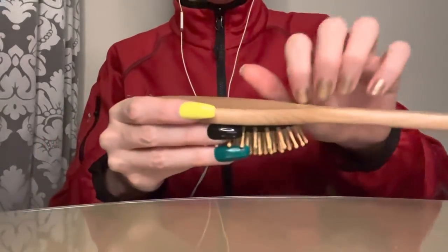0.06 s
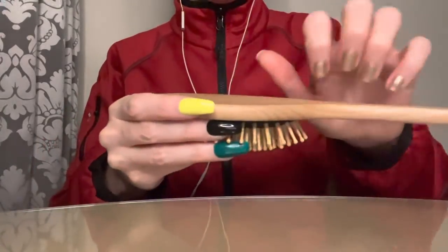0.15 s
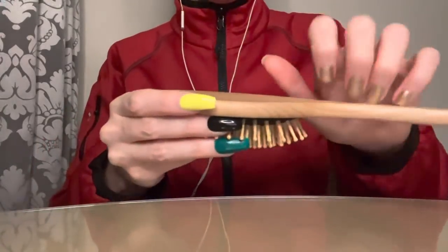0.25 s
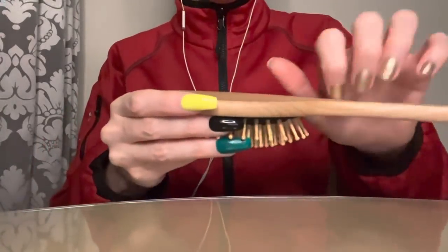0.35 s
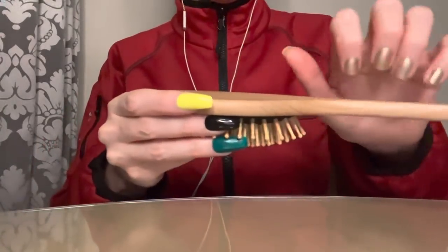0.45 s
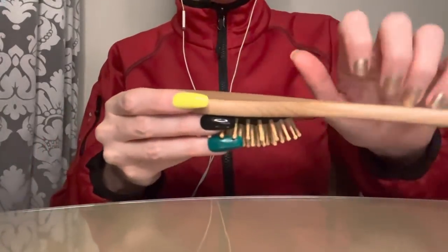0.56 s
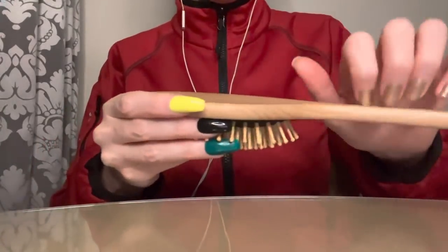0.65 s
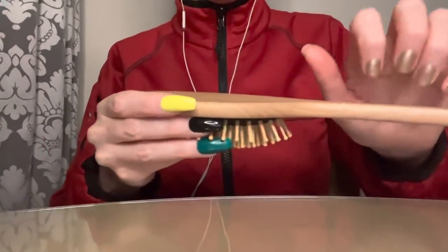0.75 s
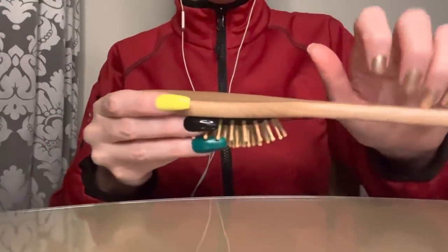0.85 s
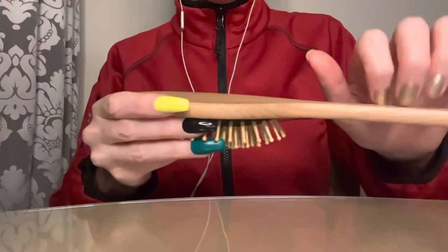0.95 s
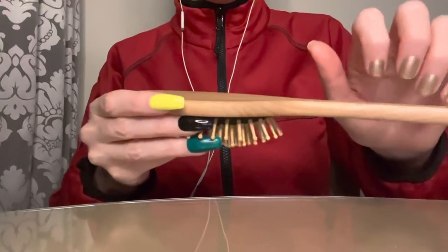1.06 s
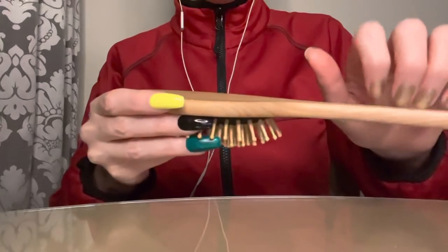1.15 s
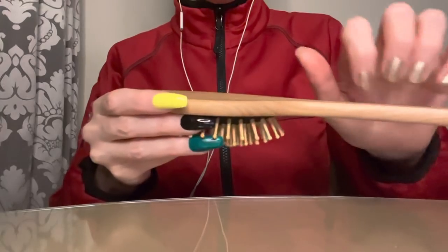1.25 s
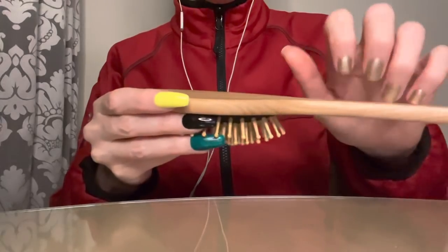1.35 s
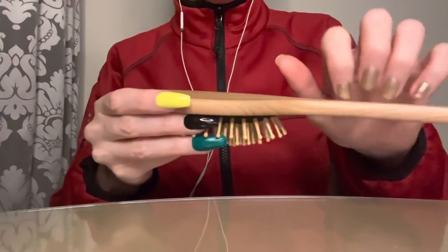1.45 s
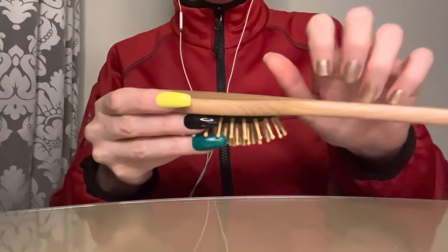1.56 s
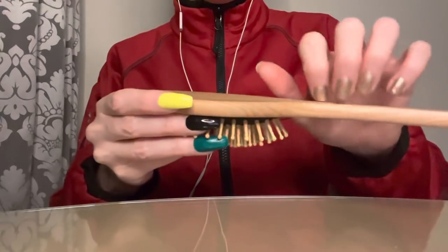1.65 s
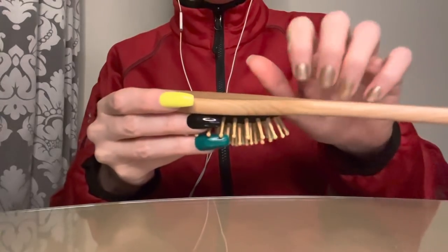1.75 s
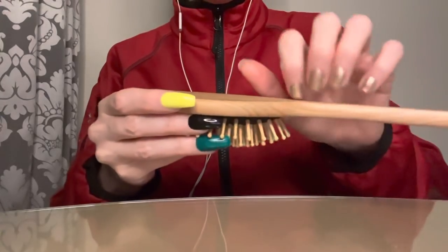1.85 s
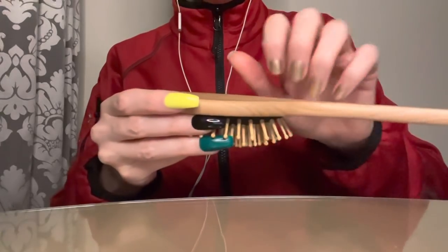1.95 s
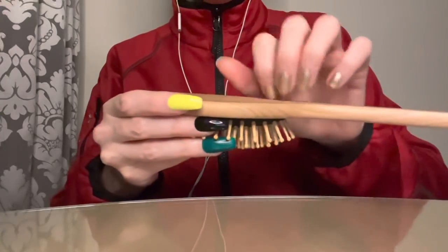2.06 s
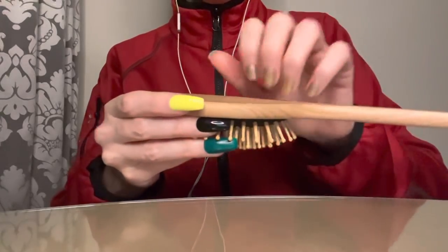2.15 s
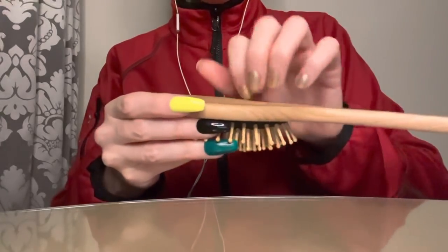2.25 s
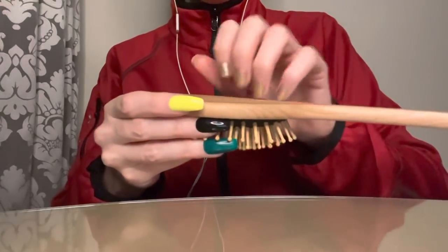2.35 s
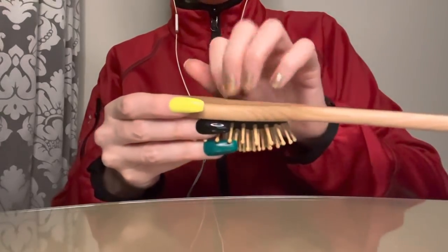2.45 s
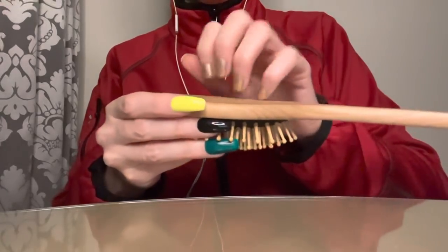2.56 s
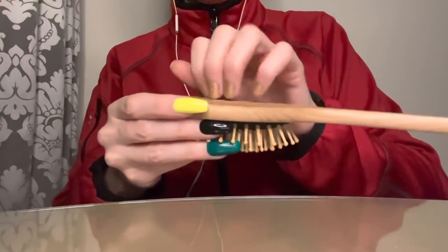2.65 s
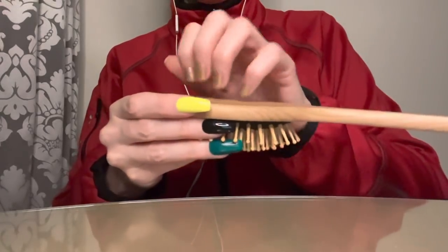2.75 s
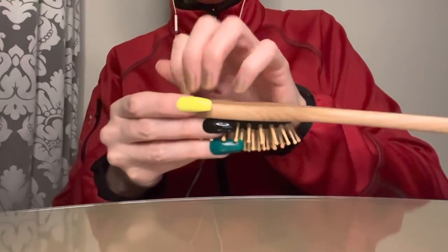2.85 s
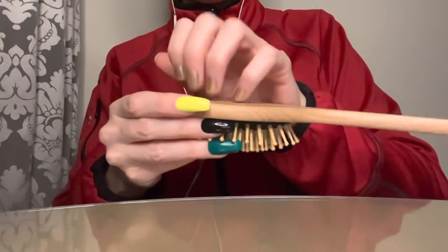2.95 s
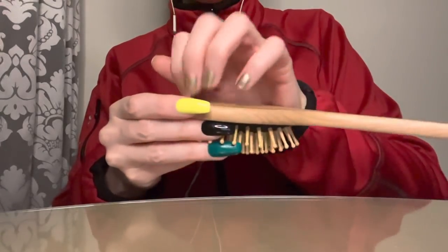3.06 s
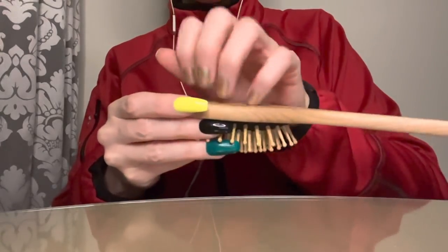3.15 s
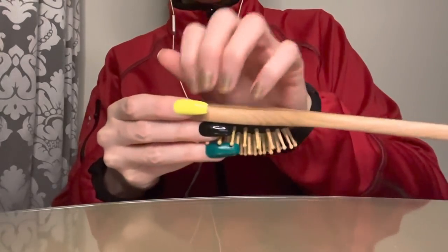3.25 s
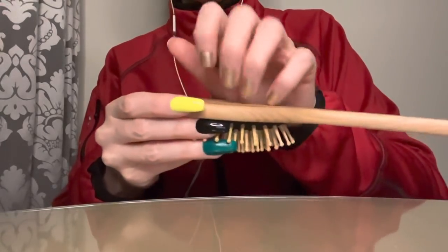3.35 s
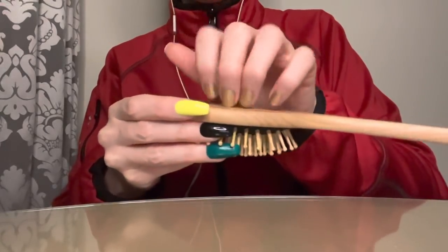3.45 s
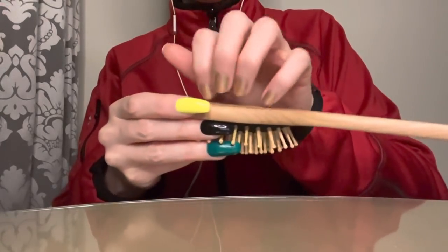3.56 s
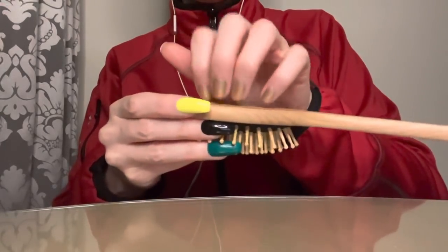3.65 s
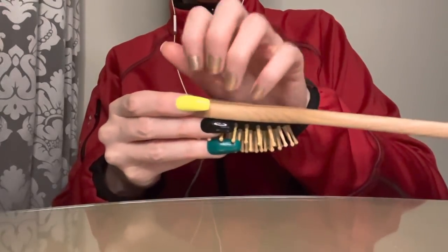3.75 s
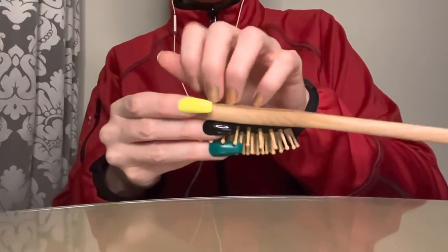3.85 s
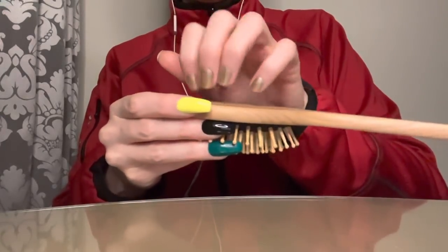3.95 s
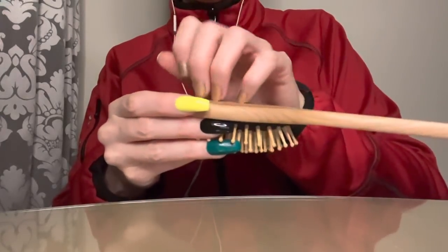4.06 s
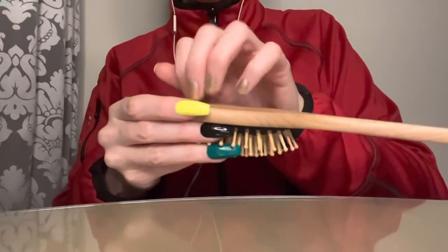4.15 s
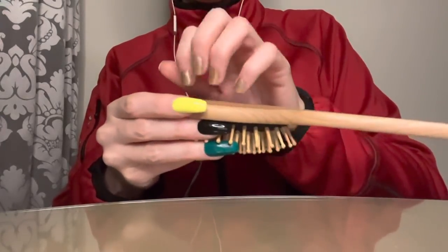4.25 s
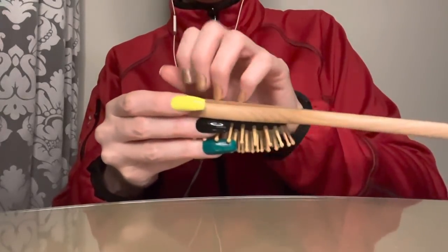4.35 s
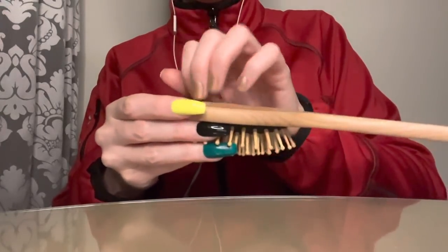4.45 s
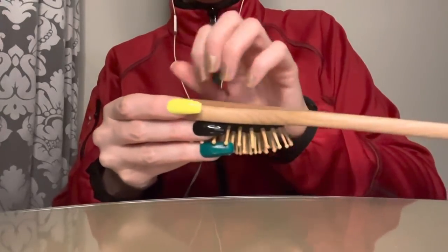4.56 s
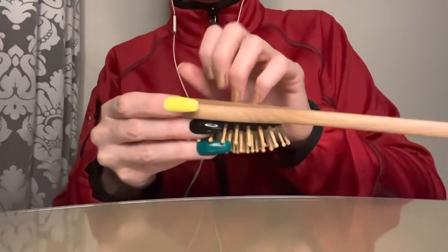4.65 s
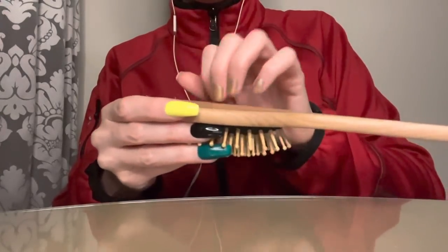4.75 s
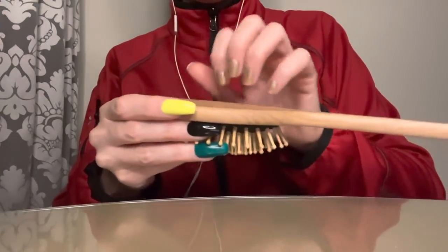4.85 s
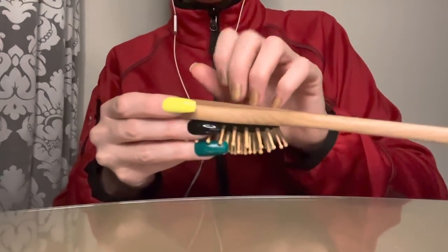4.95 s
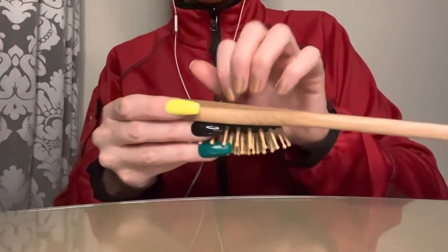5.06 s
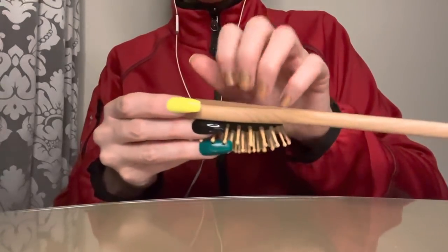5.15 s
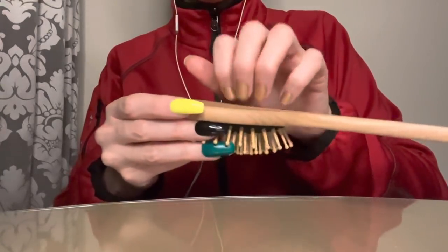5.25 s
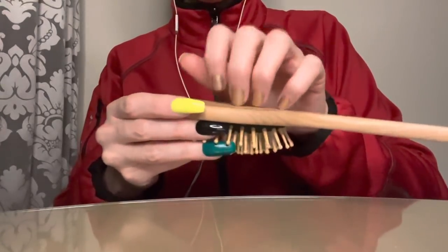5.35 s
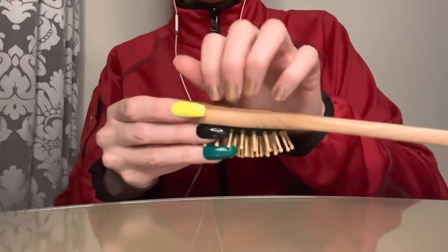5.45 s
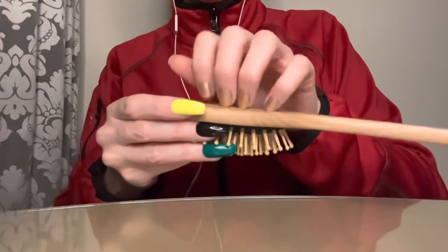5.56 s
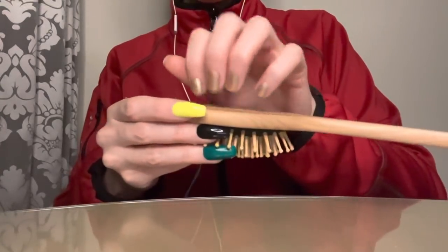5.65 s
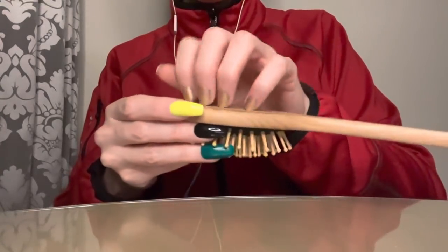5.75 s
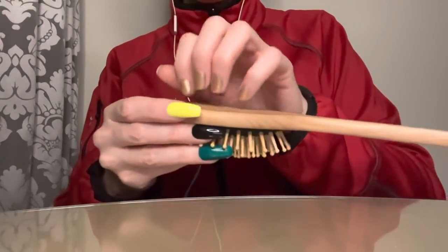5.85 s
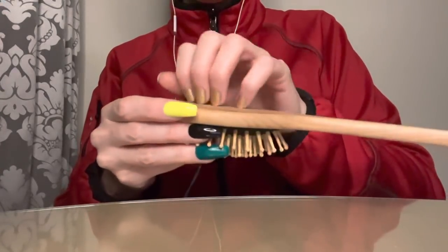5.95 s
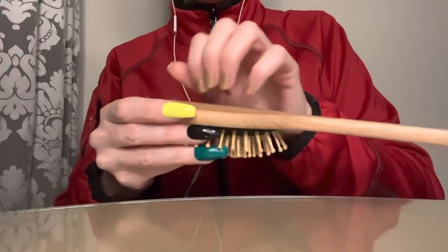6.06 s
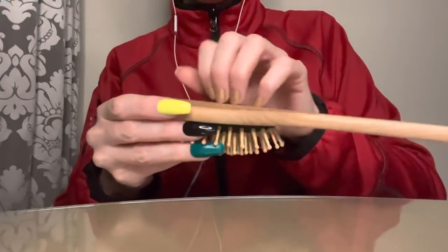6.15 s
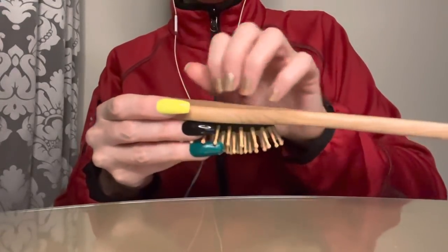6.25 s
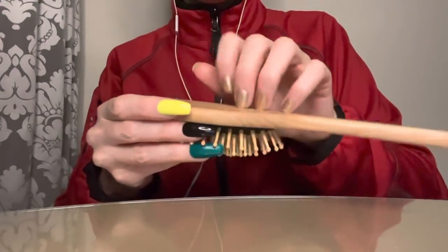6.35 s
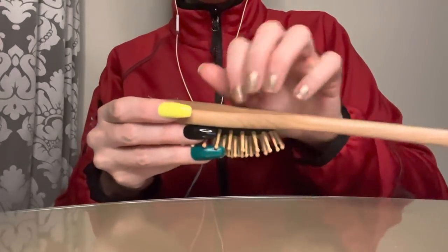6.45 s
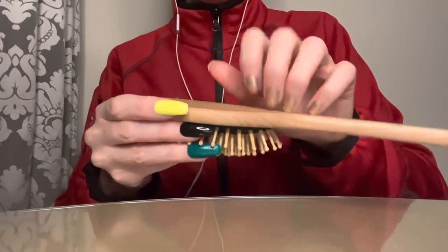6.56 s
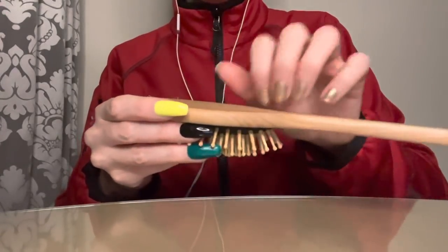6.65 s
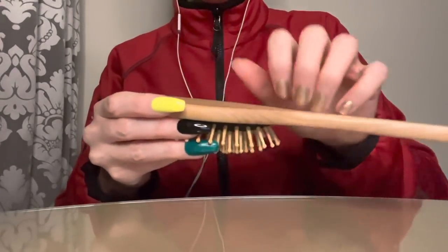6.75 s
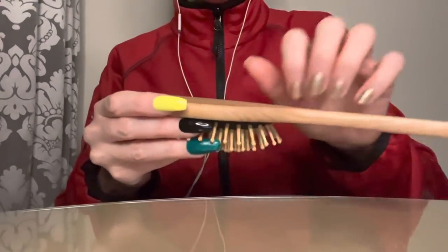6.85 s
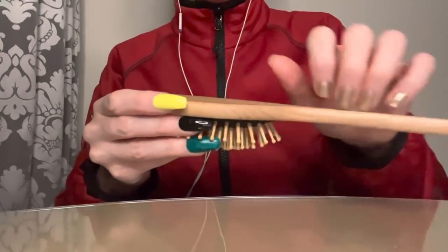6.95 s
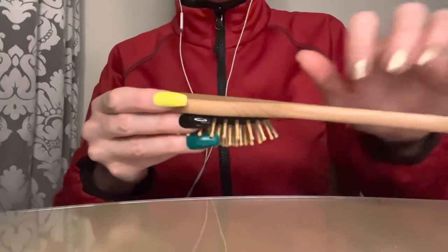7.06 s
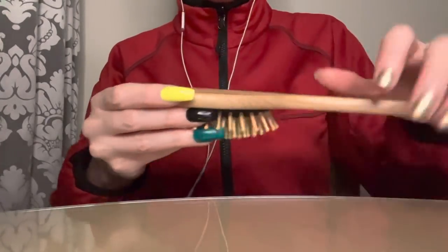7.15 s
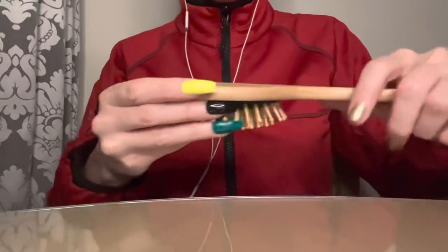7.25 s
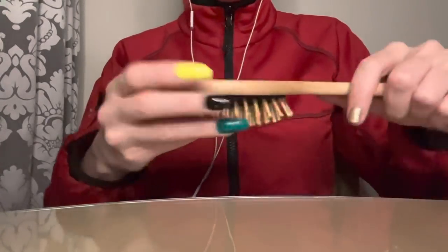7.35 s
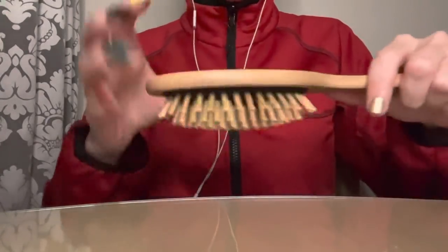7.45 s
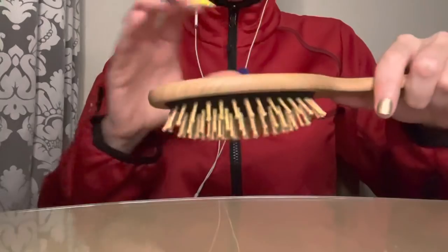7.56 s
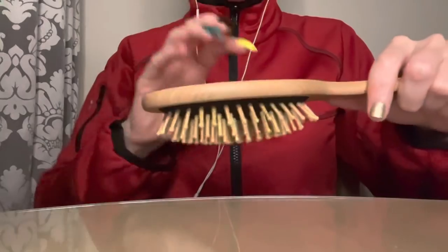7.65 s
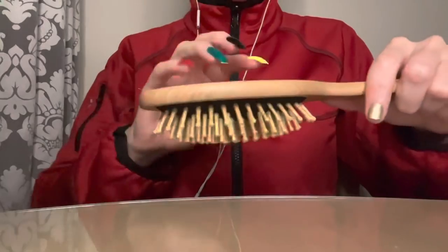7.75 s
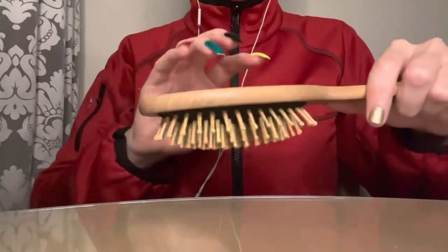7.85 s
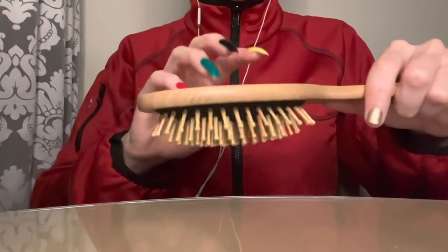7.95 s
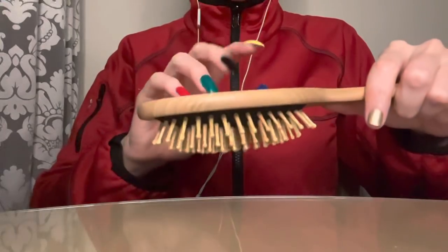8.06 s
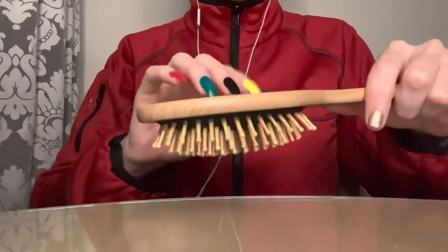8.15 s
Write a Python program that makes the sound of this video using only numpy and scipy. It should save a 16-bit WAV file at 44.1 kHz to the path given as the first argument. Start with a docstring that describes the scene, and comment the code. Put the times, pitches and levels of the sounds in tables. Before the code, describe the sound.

Long fingernails drum quick rolling flurries of dry, light clicks on a hand-held wooden hairbrush, then a hand slides and grips, followed by four crisp rim taps.

```python
"""Fingernails on a wooden hairbrush

Close microphone, small quiet room: long nails drum in quick rolls on a hand-held wooden hairbrush.
They wander from the handle over the back of the head to its tip and return; the hand slides along
the handle and grips it, then the nails of the other hand tap the rim of the head four times.
Each tap is a push that sets off decaying wood modes, plus a noisy treble tick; skids and grip are
clumped noise through the same wood. Shaped noise makes the room tail, the still air and a low hum."""
import sys
import numpy as np
from scipy import signal
from scipy.fft import rfft, irfft
from scipy.io import wavfile
from scipy.ndimage import uniform_filter1d

SR = 44100
rng = np.random.default_rng(int(sys.argv[2]) if len(sys.argv) > 2 else 0)


def wav_record(signal):
    """Record a signal, one row per channel, as 16-bit PCM in the file named by sys.argv[1]."""
    frames = np.transpose(np.atleast_2d(signal))
    bounded = np.clip(frames, -1, 1)
    # unit amplitude maps onto the largest positive 16-bit level
    quanta = np.round(bounded * 32767).astype(np.int16)
    wavfile.write(sys.argv[1], SR, quanta)


N = 362061  # length in samples

# Nail taps: start_s, strength_db, hardness_db (below 0 the nail lands flat, above 0 on its edge)
NAIL_TAPS = [(0.0267, -38, -4.5), (0.2264, -42, 8.5), (0.2523, -32.5, 0), (0.291, -32.5, -2),
             (0.3392, -38.5, -2.5), (0.5483, -37.5, 7), (0.602, -35, 0.5), (0.648, -42.5, 2),
             (0.8398, -44.0, 0.5), (0.869, -41.5, -5.5), (0.9126, -40, 5.5), (0.9667, -44.5, 10),
             (1.1155, -43.5, 0.5), (1.181, -41.5, 8.5), (1.199, -41, 7.5), (1.3545, -42.5, 1),
             (1.3757, -41.5, 10), (1.569, -40.5, 10), (1.641, -37.5, -7), (1.7759, -40, 6),
             (1.7866, -34, -5), (1.8347, -35.5, -4), (1.9885, -30.0, -4), (2.0269, -34.5, -6.5),
             (2.0478, -33, -3), (2.1953, -33.5, -7.5), (2.2146, -31, 0), (2.2281, -24.5, 1.5),
             (2.38, -25, 1), (2.4085, -25, 0.5), (2.4399, -25.5, 0), (2.5809, -32, 1.5), (2.598, -22, 0),
             (2.632, -25, -0.5), (2.6525, -31.0, 0.5), (2.7996, -32.5, 4.5), (2.8143, -27, -2),
             (2.8372, -32.5, -1), (2.9946, -23.5, -0.5), (3.001, -24, -0.5), (3.1793, -35.5, -1),
             (3.194, -28.0, -4), (3.2175, -35, -11.5), (3.3784, -37.0, 2.5), (3.3932, -24.0, 0),
             (3.4171, -29.0, 5), (3.5901, -33, 0), (3.6226, -37, -3), (3.7905, -29.5, 3),
             (3.8103, -25.0, 1.5), (3.859, -27.5, -7.5), (4.0392, -29, 11.5), (4.062, -28, -1),
             (4.0824, -27.5, -3.5), (4.157, -32.0, -2.5), (4.3239, -29.0, 4.5), (4.3573, -31.5, -0.5),
             (4.4001, -26.5, 0.5), (4.4567, -32.5, -1), (4.6364, -28.5, 7.5), (4.6608, -27.0, 2.5),
             (4.7134, -30, 2), (4.7582, -35.5, -8), (4.922, -35.0, 1), (4.9399, -25.5, -2),
             (4.9884, -25, 0), (5.0332, -38.5, -3.5), (5.175, -37.5, 0), (5.192, -27.5, -10.5),
             (5.2083, -28.5, 0), (5.3543, -43.0, -7), (5.3745, -26, -3), (5.551, -36, 3),
             (5.563, -25, -0.5), (5.5669, -30.5, -5), (5.7454, -34, -6), (5.753, -22.0, 5.5),
             (5.767, -25.5, -1.5), (5.933, -32, 3), (5.9475, -26.5, 0.5), (5.9649, -30, -5.5),
             (5.9696, -31.5, -1), (6.1465, -33.5, 4), (6.1557, -27.5, -4), (6.168, -29.0, -3),
             (6.3298, -29.5, 0), (6.355, -30.0, -1.5), (6.567, -35.5, -8), (6.5899, -32, -4.5),
             (6.6247, -34.5, 0.5), (6.778, -36, -6), (6.9828, -38, -0.5), (7.9542, -30.5, 8),
             (8.0248, -28.5, -6.5), (8.1325, -25.0, -0.5), (8.1772, -27.0, 1)]
# Where the nails land from each time on: start_s, place
TAP_PLACES = [(0, "handle"), (2.1, "back"), (2.75, "tip"), (4.12, "back"), (5.15, "tip"), (6.05, "back"),
              (6.5, "handle"), (7.5, "rim")]
# Modes, all with columns: pitch_hz, t60_s (at damping 1), then relative level_db
# when struck on the handle, the back of the head, its tip, its rim.
# The held brush giving way as a whole
KNOCK_MODES = [(87.6, 0.035, -15, -13.5, -9.5, -18), (345.6, 0.015, -3.5, -8, -2, -8),
               (513, 0.022, -3.5, -10, -6, -7), (641, 0.013, 3.5, 7, 4.5, -9),
               (810, 0.0087, 8.5, -2, -5.5, 17)]
# The wood bending
BENDING_MODES = [(1702, 0.005, -2, -7, 3, 1.5), (2053, 0.019, -9.5, 9.5, 14, 13.5)]
# The bright ring of the wood
RING_MODES = [(3600, 0.0062, 10, -5, -13, 6), (4070, 0.0027, 0, -1, 11, -24),
              (4142, 0.015, 2.5, -13, 16, -8), (4717, 0.015, -2, -5, 0.5, -1.5),
              (6220, 0.0022, 8.5, 5.5, 3, 0.5)]
# Early reflections from table and body: delay_s, level_db
NEAR_ECHOES = [(.0045, -21.5), (0.0115, -20.5)]
# Diffuse room tail: pitch_hz, t60_s, level_db (before the narrow peaks and dips)
ROOM_TAIL = [(577, 0.26, -8), (3000, 0.29, -16.5), (14000, 0.3, -16.5)]
# Colour of the still room air: pitch_hz, relative density_db (per Hz)
AIR_COLOUR = [(30, 1), (70, 3), (1200, -21.5), (15000, -30)]
# Narrow peaks and dips that colour the room tail: center_hz, gain_db (below 0 a dip)
NARROW_COLOURS = [(248, 10.5), (2090, -2.5), (4790, 8)]
# A nail or finger skids briefly over the wood: middle_s, level_db (before its swell and fade)
SKIDS = [(0.018, -44.5), (1.42, -49), (1.587, -35.5), (4.055, -35.5), (4.15, -35.5), (4.346, -33.5),
         (6.542, -45.5), (6.76, -42), (7.306, -48), (7.355, -40), (7.38, -37.5), (7.403, -39.5),
         (7.415, -33.5)]
# Per place, level_db added over 5 ms to: hollow knock, wood bending, bright ring, nail tick
PLACE_VOICING = {"handle": (2, 2.16, 1, 0), "back": (3, -1.6, 2, -3), "tip": (1.5, 1, 0.9, -2.5),
                 "rim": (-8.5, -.5, 7.5, 4.5)}
# Per place, change (dB per dB of hardness) of: knock, bending, ring, tick
PLACE_HARDENING = {"handle": (-0.54, 0.23, 0.5, -0.013), "back": (-0.63, -0.15, 0.47, .7),
                   "tip": (-0.49, 0.38, 0.4, 0.2), "rim": (-0.33, -0.58, -0.15, 0.76)}
# Low hum: time_s, level_db
HUM_LEVEL = [(0.0, -59), (0.27, -53), (1.64, -59.5), (2.05, -49), (3.06, -53.5), (4.84, -49), (5.55, -57),
             (6.46, -45.5), (8.2, -64.5)]

MODE_PLACES = ["handle", "back", "tip", "rim"]  # order of the level columns of the modes
# the hand starts to slide, its fingers start to close, its palm lands, it comes to rest (s)
SLIDE_S, CLOSE_S, LAND_S, REST_S = 7.22, 7.345, 7.401, 7.435
EDGE_HZ = 16300  # upper limit of the sound
T = np.arange(SR // 20) / SR  # time within one blow (s)


def amp(db):
    """Amplitude ratio of a level in dB."""
    return 10 ** (np.asarray(db) / 20)


def evened(x):
    """The sound brought to an RMS of one."""
    return x / np.sqrt(np.mean(x ** 2) + 1e-20)


def read(table_hz, values, hz):
    """A spectrum joined by straight lines over log frequency."""
    return np.interp(np.log(hz + 1), np.log(table_hz), values)


def band(x, hz, kind, order=2):
    """Butterworth filter."""
    sos = signal.butter(order, np.minimum(hz, SR / 2 - 1), kind, fs=SR, output="sos")
    return signal.sosfilt(sos, x)


def add(mix, start_s, sound):
    """Lays a sound into the mix, cut off at its end."""
    part = mix[round(start_s * SR):][:len(sound)]
    part += sound[:len(part)]


def blow(sound, level_db):
    """Gives a blow the energy of 5 ms at this level."""
    return amp(level_db) * sound * np.sqrt(0.005 * SR / np.sum(sound ** 2))


def narrow_colour(hz, quality=24):
    """Gain of the narrow peaks and dips at these frequencies."""
    gain_db = 0
    for center_hz, center_db in NARROW_COLOURS:
        gain_db = gain_db + center_db / (1 + (2 * quality * (hz / center_hz - 1)) ** 2)
    return amp(gain_db)


def background(air_db=-56, hum_hz=49, hum_width_hz=3, waver=0.66):
    """Soft steady air noise with a narrow low peak, and a low hum that swells, fades and wavers."""
    hz = np.fft.rfftfreq(N, 1 / SR)
    colour = amp(read(*np.transpose(AIR_COLOUR), hz))
    colour *= np.where(hz < 400, narrow_colour(hz), 1)
    air = irfft(rfft(rng.standard_normal(N)) * colour, N)

    hum_shape = 1 / (1 + ((hz - hum_hz) / hum_width_hz) ** 2)
    narrow = signal.hilbert(irfft(rfft(rng.standard_normal(N)) * hum_shape, N))
    hum = np.cos(np.angle(narrow)) * abs(narrow) ** waver  # a power below 1 calms the wavering
    hum = band(hum, 2 * hum_hz, "low")
    hum_db = np.interp(np.arange(N) / SR, *np.transpose(HUM_LEVEL))
    return amp(air_db) * evened(air) + amp(hum_db) * evened(hum)


def room(x, walls_s=0.03, scatter_s=0.001):
    """Two scattered near reflections, then a diffuse tail that builds as the walls answer."""
    hz, t, tail_bins = signal.stft(rng.standard_normal(SR // 2), SR, nperseg=256)
    table_hz, t60_s, level_db = np.transpose(ROOM_TAIL)
    fall = np.log(1000) / read(table_hz, t60_s, hz)[:, None]  # decay rate per second
    gain = amp(read(table_hz, level_db, hz))[:, None]
    tail_bins *= gain * np.sqrt(2 * fall / SR) * np.exp(-fall * t)
    tail = signal.istft(tail_bins, SR)[1]
    coloured = irfft(rfft(tail, SR) * narrow_colour(np.fft.rfftfreq(SR, 1 / SR)))
    tail = coloured[:len(tail)]
    tail *= np.minimum(np.arange(len(tail)) / SR / walls_s, 1)
    for delay_s, echo_db in NEAR_ECHOES:
        scatter = rng.standard_normal(len(T)) * np.exp(-T / scatter_s)
        add(tail, delay_s, amp(echo_db) * scatter / np.linalg.norm(scatter))
    return signal.fftconvolve(x, tail)[:N]


def wood(modes, place="handle", damping=1, spread_db=6.0, detune=0.019):
    """Modes start together and die fast; random draws vary their levels widely and pitches slightly."""
    hz, t60_s, *levels_db = np.transpose(modes)[:, :, None]
    level_db = levels_db[MODE_PLACES.index(place)]
    share, shift = rng.standard_normal((2, len(modes), 1))
    decay = amp(level_db + spread_db * share) * np.exp(-np.log(1000) * damping * T / t60_s)
    return np.sum(decay * np.cos(2 * np.pi * hz * (1 + detune * shift) * T), axis=0)


def friction(length_s, grain_db=5, hiss_db=-3, hiss_hz=7500):
    """Tiny slips come in clumps of a millisecond or two, swell and fade; they hiss and excite the wood."""
    count = int(length_s * SR)
    clumps = evened(uniform_filter1d(rng.standard_normal(count), size=70))
    slips = rng.standard_normal(count) * amp(grain_db * clumps)
    response = wood(KNOCK_MODES) / 2 + wood(BENDING_MODES, "back") + wood(RING_MODES, "back")
    body = signal.fftconvolve(slips, response)[:count]
    hiss = band(slips, hiss_hz, "low", order=1)
    rubbing = evened(evened(body) + amp(hiss_db) * evened(hiss))
    return rubbing * np.sin(np.pi * np.arange(count) / count)


def scuffs(length_s=0.025):
    """Short skids between the taps and as the fingers close on the handle."""
    out = np.zeros(N)
    for middle_s, level_db in SKIDS:
        add(out, middle_s - length_s / 2, amp(level_db) * friction(length_s))
    return out


def grip(slide_db=-50, close_db=-44, thud_hz=230, thud_db=-28):
    """The hand slides along the handle, the fingers rub as they close, and the palm lands with a soft thud."""
    out = np.zeros(N)
    add(out, SLIDE_S, amp(slide_db) * friction(REST_S - SLIDE_S, hiss_db=5))
    # soft skin stirs only the low modes
    rub = band(friction(REST_S - CLOSE_S), KNOCK_MODES[-1][0], "low", order=4)
    add(out, CLOSE_S, amp(close_db) * evened(rub))
    cycles = thud_hz * T
    thud = cycles * np.exp(-cycles) * np.sin(2 * np.pi * cycles)
    add(out, LAND_S, blow(thud, thud_db))
    return out


def contact(grain=0.1, settle_s=0.0011):
    """Force of a nail: one sharp push, then a fine chatter while its edge settles."""
    force = grain * rng.standard_normal(len(T)) * np.exp(-T / settle_s)
    force[0] = 1
    return force


def tick(hardness_db, decay_s=0.0013, snap=2.6, low_hz=5400, high_hz=7500, octaves_per_db=0.46):
    """The hard nail edge: a sharp snap and a tiny treble crackle, reaching higher the harder the tap."""
    crack = rng.standard_normal(len(T)) * np.exp(-T / decay_s)
    crack[0] = snap
    treble = band(crack, low_hz, "high", order=3)
    return band(treble, high_hz * 2 ** (octaves_per_db * hardness_db), "low", order=3)


def nails(damping=1, knock_hz=950, bending_hz=1400, ring_hz=2850, top_hz=7000):
    """Every tap knocks the brush, bends it, rings it and ticks; place and hardness set the proportions."""
    out = np.zeros(N)
    for start_s, strength_db, hardness_db in NAIL_TAPS:
        place = [where for from_s, where in TAP_PLACES if from_s <= start_s][-1]
        hardening_db = hardness_db * np.array(PLACE_HARDENING[place])
        levels_db = strength_db + np.array(PLACE_VOICING[place]) + hardening_db
        force = contact()
        # each family of modes radiates in its own range
        knock = signal.fftconvolve(force, wood(KNOCK_MODES, place))
        knock = band(knock, knock_hz, "low", order=4)
        bend = signal.fftconvolve(force, wood(BENDING_MODES, place, damping))
        bend = band(bend, (bending_hz, ring_hz), "band")
        ring = signal.fftconvolve(force, wood(RING_MODES, place, damping))
        ring = band(ring, (ring_hz, top_hz), "band")
        for sound, level_db in zip((knock, bend, ring, tick(hardness_db)), levels_db):
            add(out, start_s, blow(sound, level_db))
    return out


def scene():
    """The microphone hears one side of the brush; the walls hear all sides, which evens out its peaks."""
    handling = scuffs() + grip()
    close = nails() + handling
    distant = room(nails(damping=2.8) + handling)  # more damping broadens the wood's peaks
    return (close + distant + background())[None]


def record(dry):
    """Peaks are clipped at full scale; then a steep low-pass limits the band."""
    low_pass = signal.firwin(255, EDGE_HZ, window=("kaiser", 9), fs=SR)
    return signal.oaconvolve(np.clip(dry, -1, 1), low_pass[None], "same")


dry = scene()
out = record(dry)
wav_record(out)
```